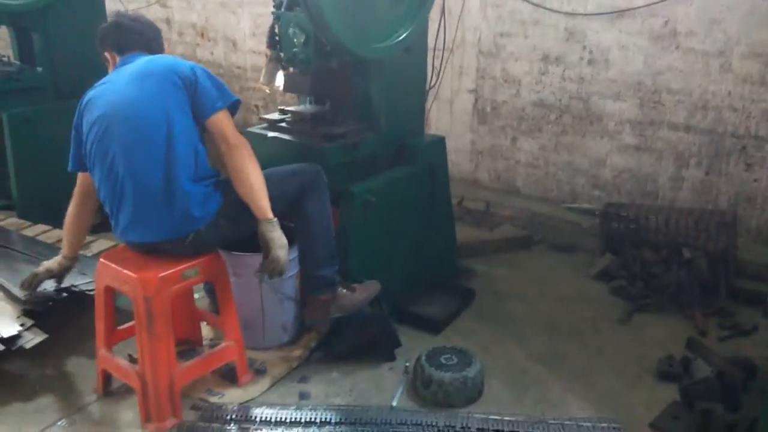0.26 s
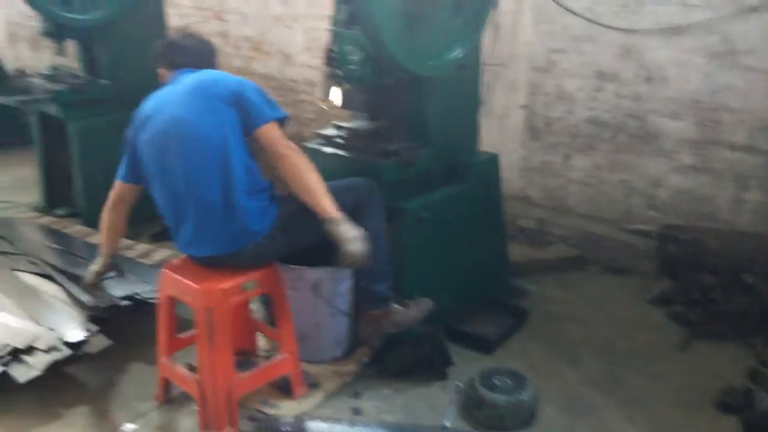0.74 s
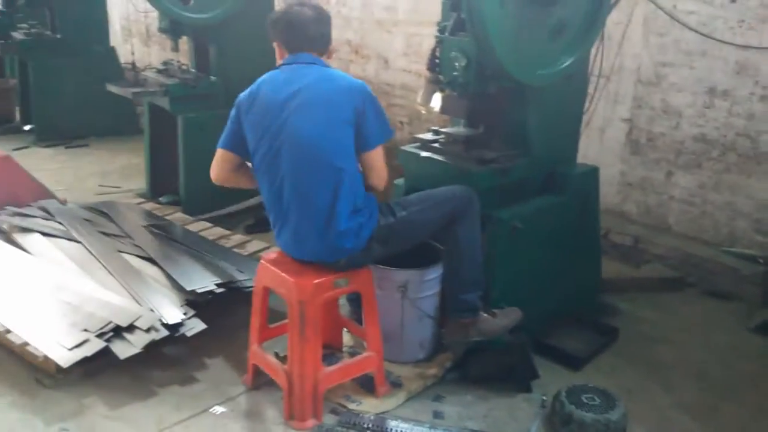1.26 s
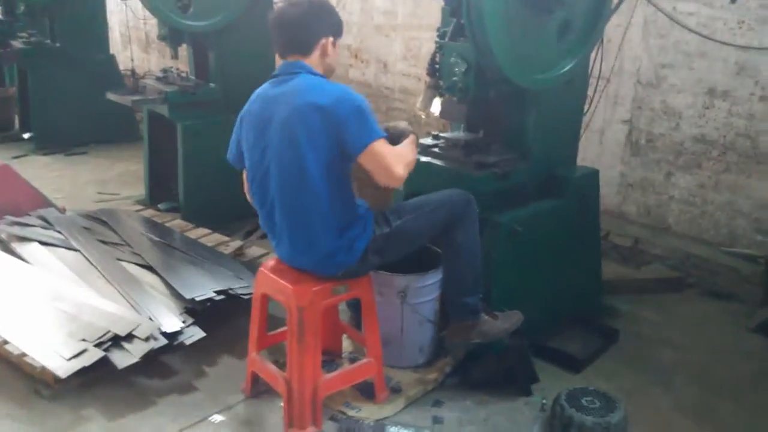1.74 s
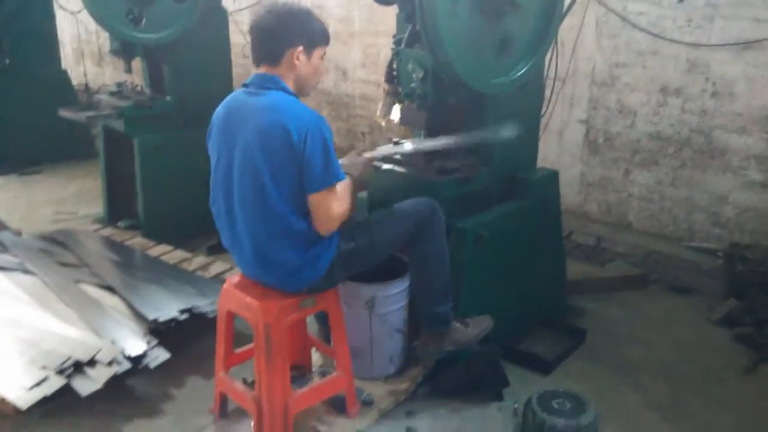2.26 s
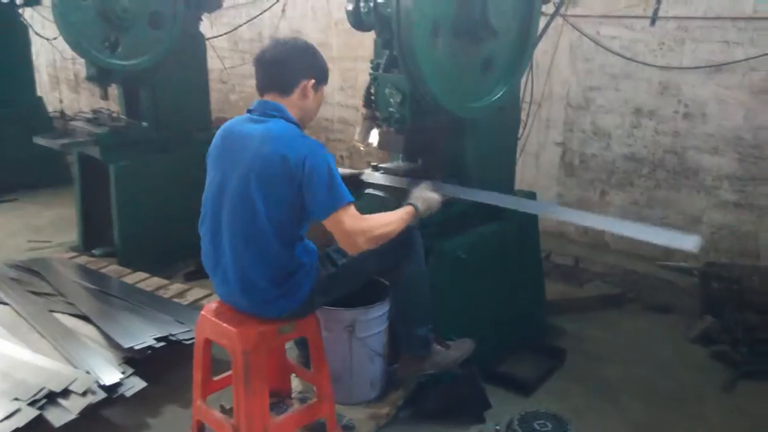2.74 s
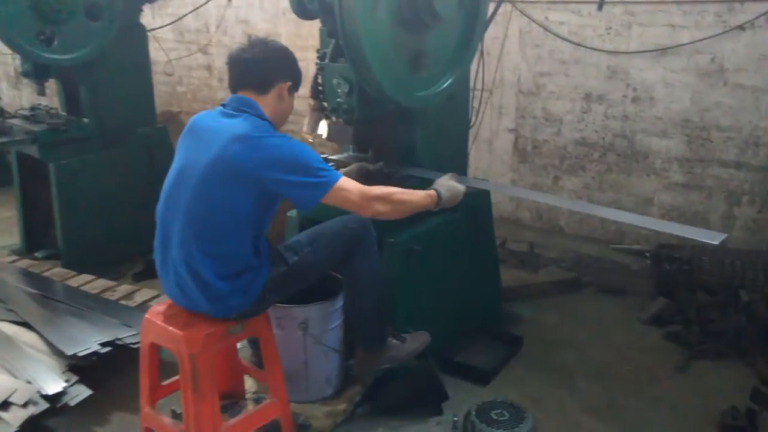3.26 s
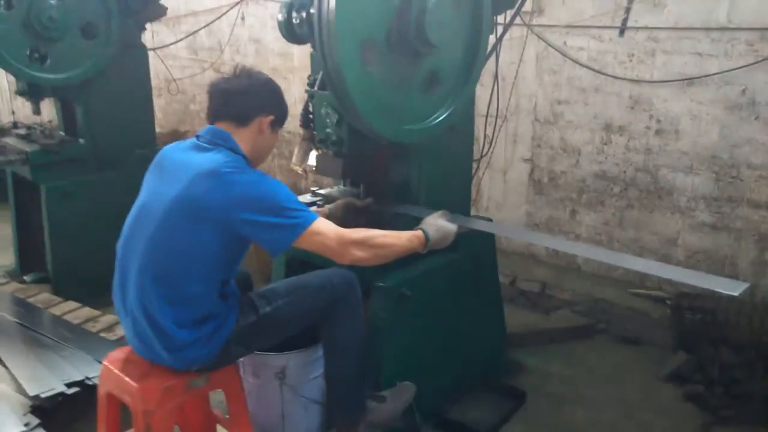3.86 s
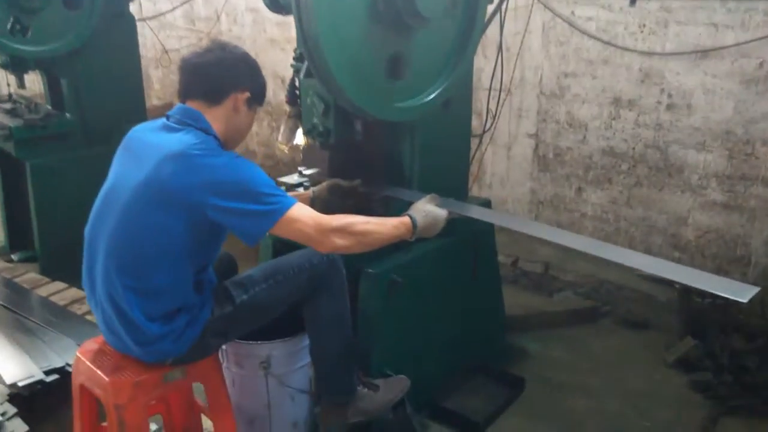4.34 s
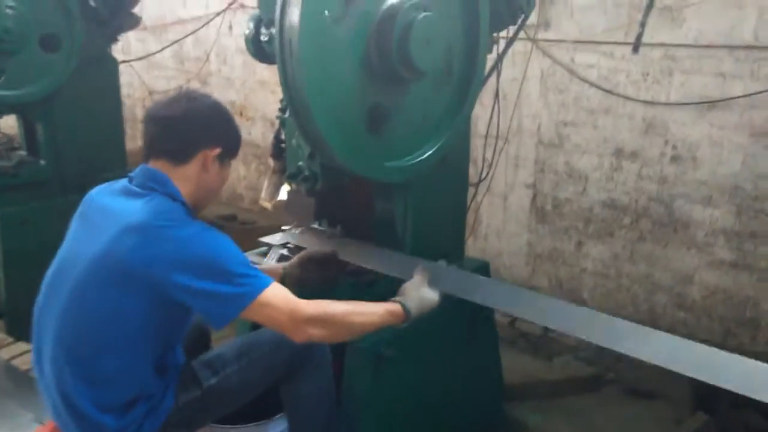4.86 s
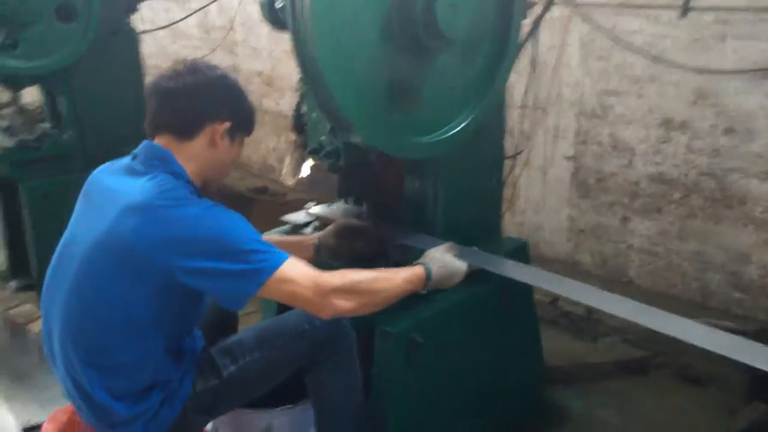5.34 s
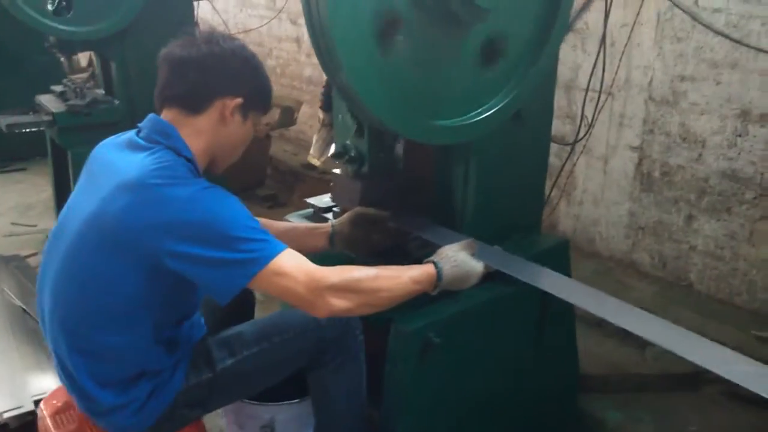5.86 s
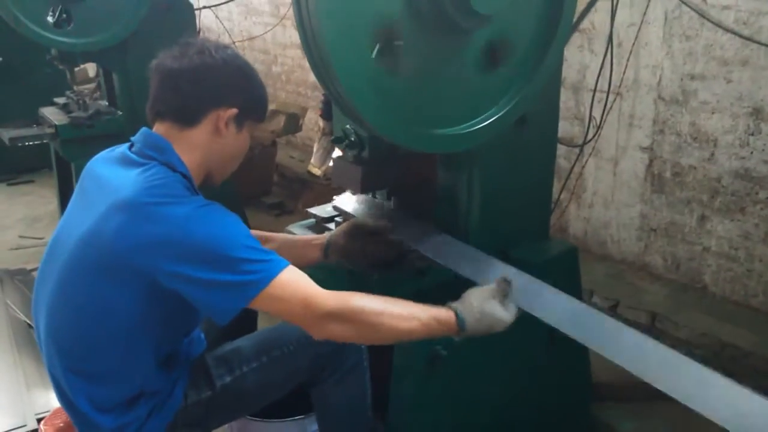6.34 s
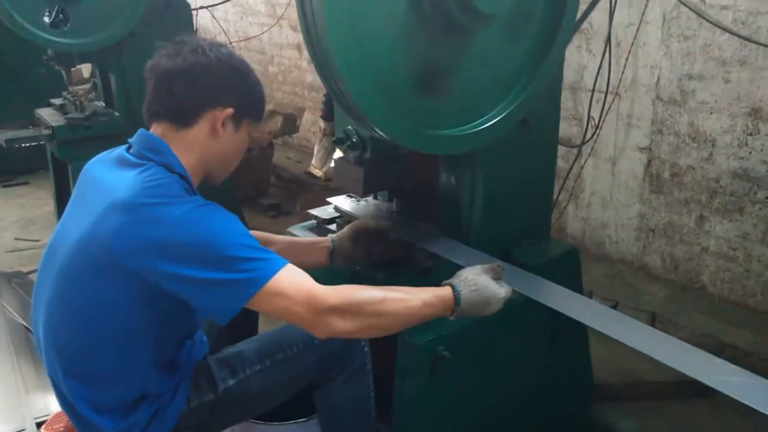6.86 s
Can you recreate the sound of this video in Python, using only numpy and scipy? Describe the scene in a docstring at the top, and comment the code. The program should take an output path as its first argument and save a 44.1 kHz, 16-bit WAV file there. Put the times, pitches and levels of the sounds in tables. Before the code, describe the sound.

Close stereo pickup in a hard, echoing factory room: the flywheel drive rumbles and growls throughout. Metal sheet slides and hisses sharply, taps steel, and the press slams with a low frame boom and crunching rattle. Two more strokes come at even intervals, amid bright ticks, ringing strip, gritty grinding and brief squeals, the last stroke rattling less. A hard metallic rasp comes near the end.

```python
"""A flywheel punch press works a steel strip in a brick workshop while its drive hums and rumbles on.
It opens in the boom of a stroke; a strip is then drawn off the pile as a shifting hiss, and knocks the die.
Near 2.1, 4.2 and 6.2 s the press strikes: clanks and a booming frame, made of fading tones and shaped noise.
Between strokes the strip scrapes, screeches and clinks as noise bursts and ringing tones, the growl of the
motor swells once near 5.3 s, and a last hard rasp comes near 6.9 s. The room adds a tail of fading noise."""
import sys
import numpy as np
from scipy import signal
from scipy.fft import rfft, irfft, next_fast_len
from scipy.io import wavfile
from scipy.ndimage import uniform_filter1d, minimum_filter1d

SR = 44100
rng = np.random.default_rng(int(sys.argv[2]) if len(sys.argv) > 2 else 0)


def output_pcm(signal):
    """Save a mono or channel-first signal as 16-bit PCM at the path in sys.argv[1].

    Samples are clipped to [-1, 1] before scaling.
    """
    pcm = np.clip(np.atleast_2d(signal).T, -1, 1) * 32767
    wavfile.write(sys.argv[1], SR, np.round(pcm).astype(np.int16))


N = 313551
T = np.arange(N) / SR  # time of every sample [s]

# Levels in the tables are relative: each source is balanced further in its own function.
# "t60" is the time in which a sound fades by 60 dB.

# ringing tones of the cast frame: (pitch [Hz], level [dB], t60 [s])
FRAME_MODES = [(158.8, -7.5, 0.96), (182.3, -14.5, 1.05), (315.3, -4.5, 1.8), (351.8, 3, 0.67),
               (363.2, -2.5, 1.27), (388, 2.5, 0.26), (491, -0.5, 1.2), (516, -14, 1.37), (649, -9, 1.6),
               (700.6, -7, 1.8), (813, -15, 2.4)]
# ringing tones of the die and clutch parts: (pitch [Hz], level [dB], t60 [s])
DIE_MODES = [(505.6, 3, 1), (818, 3.5, 0.54), (940, 12, 0.091), (1138, 2.5, 0.055), (1450, -20, 0.24),
             (1545, 17, 0.052), (1630, 2.5, 0.29), (1960, -15, 0.17), (2930, 2, 0.18), (3860, 8, 0.089),
             (5710, 9, 0.19), (7300, -4, 1)]
# ringing tones of the press bed: (pitch [Hz], level [dB], t60 [s])
BED_MODES = [(160, -15, 0.66), (172, -2.5, 0.32), (192.7, -3, 0.45), (375.7, -7.5, 0.42), (505, -4.5, 0.92),
             (800, -1.5, 0.45)]
# ringing tones of the strip; a tap's sustain scales the t60:
# (pitch [Hz], level struck on the face [dB], level struck on the edge [dB], t60 [s])
STRIP_MODES = [(6130, 1, -47, 0.19), (7840, 8.5, -34, 0.28), (9400, 2, 3, 0.34), (10200, 10, -15, 0.26),
               (10420, -13, 2, 0.38), (12400, -32, -17, 0.075), (13200, 2.5, -38, 0.44),
               (14550, -35, -8, 0.14)]

# Noise colours, for ringing too dense to hear as single tones.
# the frame's boom: (frequency [Hz], density [dB per Hz])
BOOM_COLOUR = [(40, -36), (100, -20), (165, -16), (235, -3), (355, 9), (440, 0), (515, 2), (760, -8),
               (1100, -9.5), (2000, -23.5), (5000, -48)]
# the bed's thump: (frequency [Hz], density [dB per Hz])
THUMP_COLOUR = [(25, -40), (55, -17), (95, -11.5), (150, 2), (200, -0.5), (270, -2), (400, -0.5), (700, -7),
                (1500, -23.5), (5000, -58)]
# the rattle of heavy steel parts: (frequency [Hz], density [dB per Hz])
CLANK_COLOUR = [(100, -33), (350, -13), (520, -11), (680, 11), (860, 2.5), (1200, -2), (1560, 4), (2200, 0),
                (3300, -3.5), (3900, -2), (4800, -7), (8000, -5.5), (16000, -58)]
# the strip clashing with the die, or grinding on it: (frequency [Hz], density [dB per Hz])
CLASH_COLOUR = [(500, -74), (2500, -4), (3200, -13.5), (3700, -9), (4900, -3), (5400, -2), (5700, 0.5),
                (6150, -4), (6800, 3.5), (7250, 2), (7800, 1), (8550, 8.5), (9100, 6), (10100, 6.5),
                (11500, -0.5), (13000, -8), (16000, -16)]
# the strip scraping over steel, and the drive's thin hiss: (frequency [Hz], density [dB per Hz])
SCRAPE_COLOUR = [(500, -30), (2200, -18), (3800, -24), (5000, -16.5), (6500, -12.5), (8000, 1), (9800, 5),
                 (11000, 2), (12500, -6.5), (16000, -16.5)]
# the snap of first contact: (frequency [Hz], density [dB per Hz])
SNAP_COLOUR = [(2500, -40), (5000, -39), (6500, -1.5), (10000, 14), (13500, 4), (16000, -4)]
# the strip's edge skidding hard over the die: (frequency [Hz], density [dB per Hz])
RASP_COLOUR = [(1500, -31), (2400, -19), (2750, -3), (3100, -7), (3900, -19.5), (4350, 1), (4600, -19),
               (5000, 4.5), (5450, -7), (5800, 0), (6200, -13), (12000, -23)]
# the rumble of the drive: (frequency [Hz], density [dB per Hz])
DRIVE_COLOUR = [(25, -25), (60, -5), (100, -9.5), (140, 4), (185, -1.5), (245, -0.5), (480, -4),
                (620, -1.5), (770, -2.5), (880, 2), (1100, -5), (1260, -16.5), (2200, -14.5), (4000, -23),
                (16000, -35)]
# hum of motor and gears: (pitch [Hz], level [dB])
HUM_TONES = [(119, -51), (243, -49), (430, -48.5), (614, -50), (667, -48), (705, -49), (820, -57.5),
             (861, -56), (903, -46), (975, -50), (1098, -52), (1130, -60.5)]
# how much left and right differ: (frequency [Hz], side minus mid level [dB])
STEREO_WIDTH = [(30, 0), (130, -13.5), (260, -15), (500, -5.5), (1000, -2.5), (2000, 0.5)]

# turns of the crank: (time the ram bottoms out [s], boom [dB], thump [dB], rattle [dB])
TURNS = [(-.17, -10.5, -28.5, -22), (2.138, -8, -21, -25), (4.164, -9.5, -18, -26.5), (6.186, -9, -22, -47)]
# in every turn the frame booms as the ram lands and as it lifts:
# (time after the bottom [s], level [dB], rise [s], t60 [s])
RECOILS = [(-.008, -3, 0.017, 2.09), (.145, -9, 0.032, 2.24)]
# clanks of every turn, in order: clutch latches, crank takes up the load, punch touches down,
# punch breaks through, ram lifts, clutch lets go, brake stops the crank;
# (time after the bottom [s], rattle [dB], thump [dB], rise [s], t60 [s])
TURN_CLANKS = [(-.378, -0.5, -3, .03, .9), (-.29, -31, -5.5, 0.008, 0.24), (-.05, 2, -7, .008, 0.85),
               (0, 5, -5, 0.095, 0.47), (.14, -10, -18, 0.033, 0.35), (0.321, -29, -6, 0.033, 0.38),
               (.45, -27, -2.5, 0.055, 0.35)]
# the strip is knocked against the die, and both sound; the row near 5.79 s is the clutch latching: # (time [s],
# strip clash [dB], die clank [dB], rise [s], t60 [s])
KNOCKS = [(0.209, -28.5, -32, 0.036, 0.58), (0.261, -18, -56, 0.017, 0.19),
          (.335, -19.5, -30, 0.0045, 0.67), (1.762, -16.5, -45, 0.019, 1.27),
          (1.794, -13, -24.5, 0.017, 0.46), (2.024, -9.5, -29, 0.028, 0.29),
          (2.417, -19, -46, 0.0027, 0.24), (2.442, -20, -20, 0.011, 0.56),
          (2.535, -14, -26.5, 0.0077, 0.74), (2.645, -16.5, -26.5, 0.0091, 0.63),
          (4.08, -16, -25, 0.0019, 0.13), (4.09, -3, -23, 0.00085, 0.33), (4.107, -30, -13, 0.0039, 0.2),
          (4.298, -11, -11, 0.0083, 0.33), (4.319, -20, -14.5, 0.0039, 0.5),
          (4.355, -16, -16.5, 0.0023, 0.95), (4.41, -26, -15.5, .004, .2), (4.44, -19, -15, 0.0022, 0.28),
          (4.603, -11.5, -19, 0.013, 0.44), (4.681, -11.5, -24, 0.0031, 0.25),
          (4.75, -18, -44, 0.0039, 0.082), (5.558, -52, -35.5, 0.0066, 0.45),
          (5.631, -20, -32, 0.00083, 0.26), (5.67, -11, -18, 0.0013, 0.39),
          (5.772, 2.5, -23, 0.0023, 0.046), (5.786, -15.5, -10.5, 0.0022, 0.32),
          (5.963, -13.5, -21, 0.0055, 1.8), (5.985, -20, -11, 0.0054, 0.94),
          (6.01, -32, -10.5, 0.0024, 0.1), (6.075, -11, -16.5, 0.0044, 0.31), (6.125, -28, -20, .003, .15),
          (6.221, -21, -21.5, .002, 0.18), (6.322, -31, -29, .002, 0.092), (6.485, -23, -26, 0.0018, 0.056),
          (6.292, -14, -16, 0.004, 0.72), (6.363, -10, -14, 0.0025, 0.062), (6.691, -26, -37, 0.026, 1.9),
          (6.884, -11, -23, 0.0039, 0.23), (6.912, -17, -45, 0.013, 0.07)]
# the strip is tapped and rings freely:
# (time [s], clash [dB], ring [dB], place [0 face to 1 edge], sustain [factor on t60])
TAPS = [(1.435, -27, -19, 0.93, 0.97), (2.506, -26, -25, .98, 0.66), (2.889, -26, -28, .96, .6),
        (3.119, -33, -22.5, 1, 1.5), (3.546, -23.5, -23, 1, 1.8), (4.285, -8, -18, 0.23, 0.65),
        (4.734, -7.5, -8, .3, 0.43), (4.855, -25, -19.5, 0.02, 0.89), (5.025, -33.5, -24, 0.17, 0.41),
        (5.119, -11.5, -15, 0.19, .5), (5.223, -41, -21, 0.91, 1), (5.279, -26.5, -20, 0.019, 1.07),
        (6.408, -7.5, -20, 0.78, .7), (6.953, -23, -23.5, 0.011, 1.1)]
# the strip swings about as it is lifted, laid in the die and fed: (time [s], left minus right [dB])
SWING = [(0, 20), (.88, 14), (1.1, -1.5), (2.05, 15), (3.55, 13), (4.2, 6), (5.2, 5.5), (6.2, 4.5),
         (6.7, 11.5), (7.11, 2)]
# pushes that slide the strip over steel: (time [s], scrape [dB], lower grind [dB], rise [s], t60 [s])
PUSHES = [(-.03, -26.5, -27.5, .018, 0.51), (.26, -30, -33, 0.05, 0.68), (.93, -30, -55, 0.035, 1.4),
          (1.035, -22, -48, 0.017, 1.8), (1.14, -19, -44, 0.092, 2.6), (1.53, -22, -32, 0.069, 1.2),
          (2.1, -24, -16, 0.058, 1.07), (2.472, -27, -25, 0.05, 0.68), (2.621, -27, -33, 0.048, 1.2),
          (2.87, -30, -49, 0.026, 2.1), (3.2, -32, -60, .05, 1.4), (3.43, -47, -31, .03, 1),
          (3.56, -27.5, -33, .02, 0.67), (3.761, -28, -24, 0.022, 0.92), (4.33, -29, -34, 0.029, 7.2),
          (5.3, -24.5, -40, .13, 0.12), (6.5, -47, -29.5, 0.044, 1.6), (6.62, -26.5, -25, 0.013, 1.1),
          (6.699, -22.5, -42, 0.036, 1.4)]
# the strip skids and rasps: (time [s], level [dB], rise [s], t60 [s])
DRAGS = [(1.2, -41, 0.097, 0.77), (1.56, -42, 0.038, .4), (4.09, -30, .004, 0.14), (6.68, -24, 0.028, 0.55),
         (6.884, -12.5, 0.0094, 0.12)]
# a strip is drawn off the pile: (time [s], resonance [Hz], level [dB])
DRAW = [(0.961, 7900, -36), (1.03, 8250, -32), (1.079, 8140, -33), (1.17, 8890, -25), (1.271, 9400, -14.5),
        (1.399, 9890, -23), (1.521, 9700, -36.5), (1.612, 8910, -18), (1.73, 9360, -43)]
# dry steel screeches as punch and strip slip past each other:
# (time [s], length [s], pitch [Hz], half-width [Hz], level [dB], left minus right [dB])
SCREECHES = [(0.865, 0.067, 10430, 40, -15, 25), (2.035, 0.12, 8500, 121, -21, 20),
             (2.492, .035, 11150, 350, -14, 24), (2.593, .07, 10570, 100, -19.5, 22),
             (2.88, 0.051, 8500, 200, -20.5, 10), (3.54, .035, 14600, 454, -22, 22),
             (3.542, .03, 10700, 600, -16, 22), (4.083, 0.076, 5660, 110, -16, 3),
             (4.085, 0.044, 7200, 218, -13, 2), (4.742, .05, 5400, 119.5, -23, 7),
             (5.12, .035, 5600, 200, -29, 6), (5.222, .012, 14450, 90, -9, 28),
             (5.67, 0.05, 5800, 300, -14, 3), (6.029, .2, 7110, 60, -23, 13),
             (6.07, 0.12, 12930, 130, -19, 25), (6.413, 0.016, 13000, 1190, -11, 6),
             (6.432, 0.051, 10850, 451, -13.5, 11), (6.627, 0.16, 10650, 130, -25, 28)]
# a dry bearing sings as the crank turns:
# (time [s], length [s], pitch [Hz], half-width [Hz], level [dB], left minus right [dB])
SQUEALS = [(2.04, .11, 815, 20, -28, 0), (2.88, .31, 805, 18, -28, 0)]
# the growl swells once while the press idles: (time [s], length [s], level [dB])
SWELL = (5.1, 0.47, -43)

# the bed shakes in step with the turn
SHAKE_HZ, SHAKE_DEPTH = 17, 0.093
# only hard knocks reach the bed: a clank of HARD_DB thumps at BED_DB, and softer ones fall off faster
HARD_DB, BED_DB, BED_SLOPE = -11, -14.5, 1.84
DIE_LAG_S = 0.0046  # the heavy die builds up a little after the strip
# inside every clank, loose parts collide many times, each with its own strength and pitches
CRUNCH_PER_S, CRUNCH_T60_S, CRUNCH_SPREAD_DB = 190, 0.04, 15
CRUNCH_LOW_HZ, CRUNCH_HIGH_HZ = 801, 5492
KNOCK_RING_DB, KNOCK_PLACE = -22, 0.27  # a knock leaves the strip ringing only faintly
TAP_T60_S, SLAP_S, GRAZE_S = 0.15, 0.00042, 0.0041  # the face slaps at once, the edge grazes into contact
SNAP_T60_S = 0.04  # first contact snaps across the whole treble before the tones stand out
RUB_DB = -37  # the strip rubs lightly even between pushes
SLIDE_PAN_DB = 8.5  # the sliding edge lies a little further left
# the motor growls while it pulls the flywheel back up to speed after each turn;
# the growl grows as the listener comes closer
GROWL_DB, APPROACH_DB_PER_S, LOAD_DB, RECOVERY_S = -48.5, 1, 7, 0.72
RUMBLE_DB_PER_S = -0.53  # the rumble recedes as the listener moves
TOP_HZ = 15900  # the sound is cut above this


def strokes(ring_db=-4.0):
    """The landing and lifting ram shakes the cast frame: fading tones over a shuddering boom of noise."""
    power, tones = np.zeros(N), np.zeros((2, N))
    for s, db, rise, t60 in ram_blows():
        add(power, s, (undb(db) * fade(t60, rise)) ** 2)
        frame = ring(FRAME_MODES, scatter_db=0.5, detune=0.0035, flex=0.027)
        add(tones, s, undb(db + ring_db) * frame * build_up(rise))
    shudder = flutter(rate=60, depth_db=1.8)
    boom = undb(-3.5) * np.sqrt(power) * shudder * noise(BOOM_COLOUR)
    return (boom + tones) * pan(4.0)


def ram_blows():
    """Every turn booms the same way: rows of (time [s], level [dB], rise [s], t60 [s])."""
    return [(s + after, boom_db + db, rise, t60)
            for s, boom_db, _, _ in TURNS
            for after, db, rise, t60 in RECOILS]


def clanks(ring_db=-14, steel_db=-1.5, body_db=-6, thud_db=-2.0):
    """Loose heavy parts slam and chatter: a crunching rattle above the thump and short ring of the bed."""
    steel, body = np.zeros((2, N)), np.zeros((2, N))
    force, thump = np.zeros(N), np.zeros(N)
    for s, db, thump_db, rise, t60 in die_blows():
        rattle = fade(t60, rise)[:SR] * noise(CLANK_COLOUR, ripple_db=5, spacing_hz=55, size=SR)
        die = ring(DIE_MODES, scatter_db=2.5, detune=0.0016, flex=0.0022)
        add(steel, s, undb(db) * (rattle + undb(ring_db) * die * build_up(rise)))
        bed_tones = ring(BED_MODES, scatter_db=3.5, detune=0.015, flex=0.018)
        add(body, s, undb(thump_db) * bed_tones * build_up(rise))
        add(force, s, (undb(db) * fade(t60, rise)) ** 2)
        # the bed's thump outlasts the rattle
        add(thump, s, (undb(thump_db) * fade(2.3 * t60, rise)) ** 2)
    chatter = rebounds(rate=140, t60=0.03, depth_db=-6) * flutter(rate=600, depth_db=1)
    crunch = undb(-1.5) * np.sqrt(force) * collisions()
    # the shake switches to the next turn when its clutch latches
    turn_time = since_bottom(lead=-TURN_CLANKS[0][0])
    shake = 1 + SHAKE_DEPTH * np.cos(2 * np.pi * SHAKE_HZ * turn_time)
    thud = np.sqrt(thump) * shake * noise(THUMP_COLOUR)
    bed = undb(body_db) * body + undb(thud_db) * thud
    return undb(steel_db) * (steel * chatter + crunch) + bed * pan(2.9)


def die_blows():
    """Clanks of each turn, then knocks: rows of (time [s], level [dB], thump [dB], rise [s], t60 [s])."""
    turning = [(s + after, rattle_db + db, thump_db + bed_db, rise, t60)
               for s, _, thump_db, rattle_db in TURNS
               for after, db, bed_db, rise, t60 in TURN_CLANKS]
    knocks = [(s, db, BED_DB + BED_SLOPE * (db - HARD_DB), rise + DIE_LAG_S, t60)
              for s, _, db, rise, t60 in KNOCKS]
    return turning + knocks


def rebounds(rate, t60, depth_db):
    """Loose parts bounce at random moments: a jagged gain of unit power."""
    kicks = (rng.random(N) < rate / SR) * rng.uniform(.2, 1, N)
    bounce = fade(t60, rise=0.0011)[:SR // 4]
    gain = 1 + undb(depth_db) * signal.fftconvolve(kicks, bounce)[:N]
    return gain / np.sqrt(np.mean(gain ** 2))


def collisions(count=4):
    """Small hard hits at random moments, each ringing briefly at a few pitches of its own; unit level."""
    out, t = np.zeros((2, N)), T[:SR // 15]
    decay = np.exp(-np.log(1000) * t / CRUNCH_T60_S)
    for when, strength, *pitches in rng.random((int(CRUNCH_PER_S * N / SR), 2 + count)):
        hz = CRUNCH_LOW_HZ * (CRUNCH_HIGH_HZ / CRUNCH_LOW_HZ) ** np.array(pitches)[:, None]
        # higher pitches are weaker
        modes = np.sin(2 * np.pi * (hz * t + rng.random((2, count, 1)))) * np.sqrt(CRUNCH_LOW_HZ / hz)
        add(out, when * N / SR, undb(CRUNCH_SPREAD_DB * strength) * modes.sum(axis=1) * decay)
    return out / out.std()


def clinks(tick_db=-5, snap_db=2):
    """Thin steel hits the die: a tick, a bright clash and a few lingering tones."""
    clash, tones = np.zeros((2, N)), np.zeros((2, N))
    for s, db, ring_db, rise, t60, place, sustain in strip_blows():
        edge, sides = np.clip(place, 0, 1), pan(swing(s))
        # the place of the blow decides which tones it wakes
        modes = [(hz, face_db + edge * (edge_db - face_db), sustain * decay)
                 for hz, face_db, edge_db, decay in STRIP_MODES]
        shape = np.hypot(fade(t60, rise), undb(tick_db) * fade(.04, rise))[:SR]
        hit = shape * noise(CLASH_COLOUR, ripple_db=4.5, spacing_hz=100, size=SR)
        add(clash, s, undb(db - 1.0) * sides * hit)
        snap = fade(SNAP_T60_S, rise)[:SR // 8] * noise(SNAP_COLOUR, size=SR // 8)
        add(clash, s, undb(ring_db + snap_db) * sides * snap)
        lingering = ring(modes, scatter_db=1, detune=.002, flex=.012, flex_rate=450) * build_up(rise)
        add(tones, s, undb(ring_db) * sides * lingering)
    # the ringing strip buzzes against the die, which roughens its tones and breaks them up
    buzz = flutter(rate=420, depth_db=3) * flutter(rate=55, depth_db=2.2)
    return clash * flutter(rate=820, depth_db=-1.5) + tones * buzz


def strip_blows():
    """Knocks damp the strip, taps let it ring: rows of time, clash, ring, rise, t60, place, sustain."""
    knocks = [(s, db, db + KNOCK_RING_DB, rise, t60, KNOCK_PLACE, 1) for s, db, _, rise, t60 in KNOCKS]
    taps = [(s, db, ring_db, np.interp(place, [0, 1], [SLAP_S, GRAZE_S]), TAP_T60_S, place, sustain)
            for s, db, ring_db, place, sustain in TAPS]
    return knocks + taps


def swing(s):
    """The strip's position at time s, as left minus right level [dB]."""
    return np.interp(s, *np.transpose(SWING))


def slide():
    """The strip's edge catches and slips, grinds when pressed down, and rasps when dragged hard."""
    power, pressed, drag = np.full(N, undb(RUB_DB) ** 2), np.zeros(N), np.zeros(N)
    for s, db, grind_db, rise, t60 in PUSHES:
        add(power, s, (undb(db) * fade(t60, rise)) ** 2)
        add(pressed, s, (undb(grind_db) * fade(t60, rise)) ** 2)
    for s, db, rise, t60 in DRAGS:
        add(drag, s, undb(db) * fade(t60, rise))
    catches = flutter(rate=33, depth_db=1.5) * flutter(rate=640, depth_db=-0.4)
    scrape = undb(1.33) * np.sqrt(power) * noise(SCRAPE_COLOUR, ripple_db=7, spacing_hz=30.05)
    grind = np.sqrt(pressed) * noise(CLASH_COLOUR, ripple_db=6, spacing_hz=90)
    grind = grind * flutter(rate=110, depth_db=2.5)
    rasp = drag * noise(RASP_COLOUR) * flutter(rate=200, depth_db=1.5) * pan(5.7)
    return catches * ((scrape + grind) * pan(swing(T) + SLIDE_PAN_DB) + rasp)


def drawn(width_hz=600, lower_ratio=.77, lower_db=-11):
    """A strip leaves the pile: two hissing resonances shift as the point of contact travels along it."""
    s, hz, db = np.transpose(DRAW)
    level = undb(np.interp(T, s, db, left=-120, right=-120))
    pitch = np.interp(T, s, hz)
    hiss = band(pitch, width_hz) + undb(lower_db) * band(lower_ratio * pitch, width_hz)
    return level * hiss * flutter(rate=71, depth_db=1) * pan(3.8)


def screeches(notes):
    """Dry rubbing parts: each note is a rough resonance, some nearly a whistle, others a wide rasp."""
    out, size = np.zeros((2, N)), SR // 3
    for s, length, hz, width, db, pan_db in notes:
        swell = np.sin(np.pi * np.minimum(T[:size] / length, 1))
        add(out, s, undb(db) * swell * band(hz, width, size) * pan(pan_db) / np.sqrt(2))
    return out


def drive(rumble_db=-35.5, hiss_db=-40, growl_hz=141):
    """Motor, belt and flywheel run on: noise rumble, wavering hum and growl tones, and a thin hiss."""
    rumble = undb(rumble_db + RUMBLE_DB_PER_S * T) * noise(DRIVE_COLOUR)
    hum = sum(undb(db) * flutter(rate=20, depth_db=4) * tone(hz, waver_hz=4.5, rate=40)
              for hz, db in HUM_TONES)
    load = np.exp(-since_bottom() / RECOVERY_S)
    growl_db = GROWL_DB + APPROACH_DB_PER_S * T + LOAD_DB * load + 2 * walk(18)
    s, length, swell_db = SWELL
    swell = undb(swell_db) * np.sin(np.pi * np.clip((T - s) / length, 0, 1))
    growl = (undb(growl_db) + swell) * tone(growl_hz, waver_hz=4.82, rate=25)
    hiss = noise(SCRAPE_COLOUR, ripple_db=2, spacing_hz=40) * flutter(rate=12, depth_db=1)
    return (rumble + undb(0.5) * hum + growl) * pan(3.4) + undb(hiss_db) * hiss * pan(7.9)


def workshop(x, wet_db=-7, low_t60=0.65, high_t60=0.68, split_hz=1400):
    """Brick walls return a diffuse tail, made of fading noise; lows and highs linger almost equally."""
    tail = noise([(20, 0), (20000, 0)])
    low = signal.sosfilt(signal.butter(2, split_hz, fs=SR, output="sos"), tail)
    high = signal.sosfilt(signal.butter(2, split_hz, "high", fs=SR, output="sos"), tail)
    low_fade, high_fade = fade(low_t60, rise=0.015), fade(high_t60, rise=0.0086)
    echo = low[:, :len(low_fade)] * low_fade - high[:, :len(high_fade)] * high_fade
    echo = echo / np.sqrt(np.sum(echo ** 2) / 2)
    return x + undb(wet_db) * signal.fftconvolve(x, echo, axes=1)[:, :N]


def since_bottom(lead=0):
    """Seconds since the ram last bottomed out; each turn takes over lead seconds early."""
    bottoms = np.array([turn[0] for turn in TURNS])
    return T - bottoms[np.searchsorted(bottoms, T + lead) - 1]


def ring(modes, scatter_db, detune, flex, flex_rate=125):
    """Fading tones; every blow weights and detunes them a little, and they waver as the part flexes."""
    t = (np.cumsum(1 + flex * walk(flex_rate, size=SR)) / SR).astype(np.float32)
    out = np.zeros((2, SR))
    draws = rng.standard_normal((len(modes), 4))
    for (hz, db, t60), (pitch_draw, level_draw, phase_draw, ear_draw) in zip(modes, draws):
        angle = float(2 * np.pi * hz * (1 + detune * pitch_draw)) * t
        decay = np.exp(-float(np.log(1000) / t60) * t)
        # high tones reach the two ears out of step
        ear_shift = np.array([[1], [-1]]) * ear_draw * min(hz / 1500, 2)
        phase = np.pi * phase_draw + ear_shift
        level = float(undb(db + scatter_db * level_draw))
        out += level * decay * np.sin(angle + phase.astype(np.float32))
    return out


def build_up(rise):
    """A one-second gain that climbs in a straight line to 1 in rise seconds, as a blow builds up."""
    return np.minimum(T[:SR] / rise, 1)


def fade(t60, rise):
    """Envelope of one blow: a quick build-up, then a steady decay, 1.6 s long in all."""
    t = T[:int(1.6 * SR)]
    return np.minimum(t / rise, 1) * np.exp(-np.log(1000) * np.maximum(t - rise, 0) / t60)


def noise(spectrum, ripple_db=0, spacing_hz=80, size=N):
    """Coloured stereo noise of unit level; the ripple packs it with close metallic resonances."""
    padded = next_fast_len(size, True)
    hz = np.fft.rfftfreq(padded, 1 / SR)
    ripple = np.interp(hz / spacing_hz, np.arange(4096), rng.standard_normal(4096))
    # the ripple grows to full depth at 1500 Hz, and its peaks are limited
    ripple = np.minimum(ripple, 2) * np.minimum(hz / 1500, 1)
    colour = along(spectrum, hz) * undb(ripple_db * ripple)
    mid, side = rfft(rng.standard_normal((2, padded))) * colour
    side = side * along(STEREO_WIDTH, hz)
    x = irfft(np.array([mid + side, mid - side]), padded)[:, :size]
    return x / x.std()


def band(hz, width_hz, size=N):
    """A resonance excited at random: a narrow stereo hiss around a fixed or moving pitch."""
    lowpass = signal.butter(2, width_hz, fs=SR, output="sos")
    re, im = signal.sosfilt(lowpass, rng.standard_normal((2, 2, size)))
    # slow noise shifted up to the wanted pitch
    phase = 2 * np.pi * np.cumsum(hz * np.ones(size)) / SR
    x = re * np.cos(phase) + im * np.sin(phase)
    return x / x.std()


def tone(hz, waver_hz, rate, size=N):
    """A sine whose pitch wanders."""
    return np.sin(2 * np.pi * np.cumsum(hz + waver_hz * walk(rate, size)) / SR)


def flutter(rate, depth_db):
    """An uneven, flickering gain of unit power."""
    gain = undb(depth_db * walk(rate))
    return gain / np.sqrt(np.mean(gain ** 2))


def walk(rate, size=N):
    """Random wander with a spread near 1: straight lines between random points, rate points a second."""
    return 1.2 * np.interp(T[:size] * rate, np.arange(16384), rng.standard_normal(16384))


def pan(db):
    """Left and right gains for a left minus right level [dB], fixed or moving; mean power 1."""
    gain = undb(np.array([[1], [-1]]) * db / 2)
    return gain / np.sqrt(np.mean(gain ** 2, axis=0))


def along(points, hz):
    """Read (frequency [Hz], level [dB]) points on a log frequency axis as gains."""
    f, db = np.transpose(points)
    return undb(np.interp(np.log(hz + 1), np.log(f), db))


def undb(db):
    """Decibels to gain."""
    return 10 ** (np.asarray(db) / 20)


def add(track, s, x):
    """Mix x into the track from time s [s], dropping whatever falls outside it."""
    i = int(s * SR)
    x = x[..., max(-i, 0):N - i]
    track[..., max(i, 0):max(i, 0) + x.shape[-1]] += x


def scene():
    """Press and strip sound in the room, over the running drive."""
    press = strokes() + clanks()
    strip = clinks() + slide() + drawn()
    rubbing = screeches(SQUEALS) + screeches(SCREECHES)
    return workshop(undb(-0.77) * (press + strip + rubbing)) + drive()


def record(dry, ceiling=1.0):
    """The loudest peaks are ducked smoothly, then the top of the treble is cut."""
    room = np.minimum(ceiling / (np.abs(dry).max(axis=0) + 1e-9), 1)
    # 441 samples = 10 ms: hold the lowest gain, then smooth it
    gain = uniform_filter1d(minimum_filter1d(room, size=441), size=441)
    return signal.sosfilt(signal.ellip(8, .2, 80, TOP_HZ, fs=SR, output="sos"), dry * gain)


dry = scene()
out = record(dry)
output_pcm(out)
```